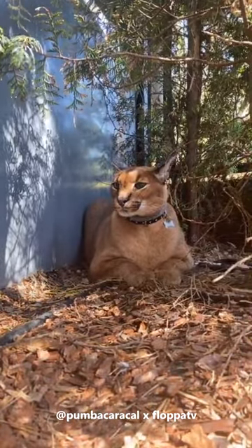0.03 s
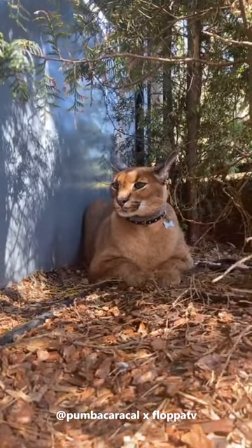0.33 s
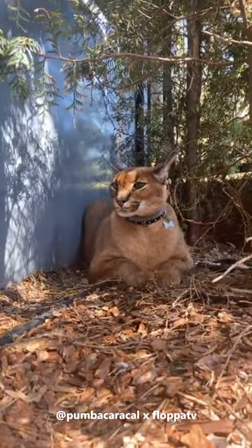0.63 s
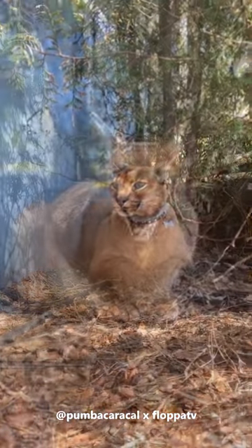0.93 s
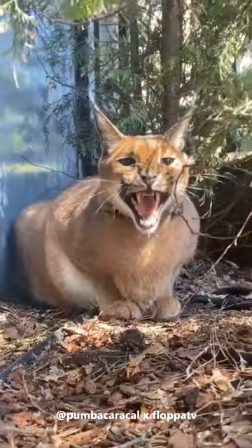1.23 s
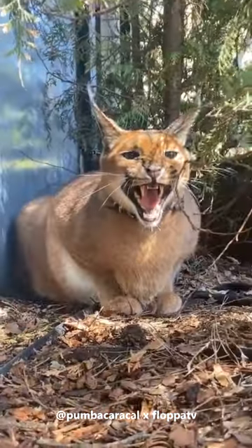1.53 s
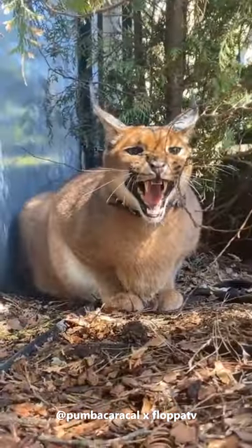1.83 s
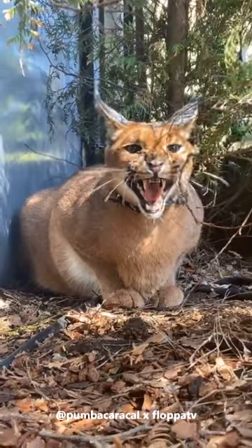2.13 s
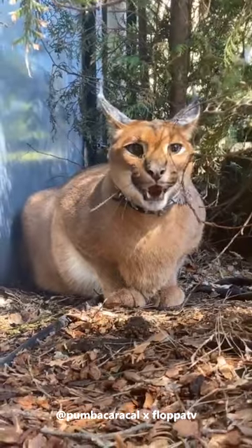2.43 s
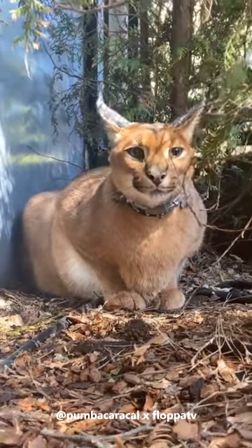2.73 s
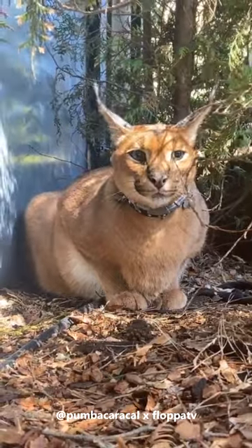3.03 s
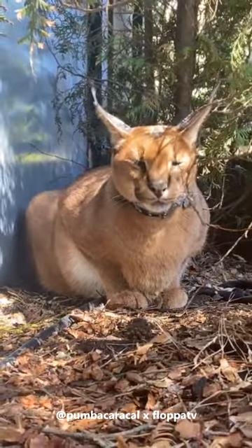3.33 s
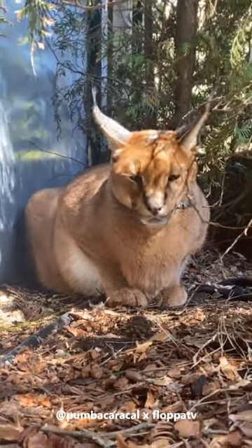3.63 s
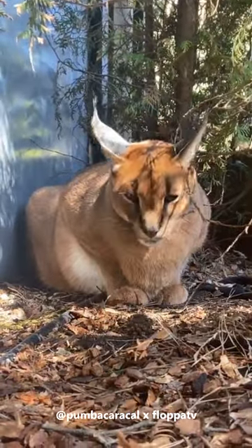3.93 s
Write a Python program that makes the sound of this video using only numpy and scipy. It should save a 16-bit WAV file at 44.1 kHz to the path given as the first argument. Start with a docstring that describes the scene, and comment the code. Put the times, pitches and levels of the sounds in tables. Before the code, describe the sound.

One long hiss from a caracal, with low gusts of wind buffeting the microphone.

```python
"""A broad outdoor rush comes first, at a microphone under garden trees; it fades to a quieter, distant
background. As it fades, a caracal opens its mouth and gives one long, breathy hiss: air forced through
the throat rings the mouth and dulls as the breath runs out. Wind buffets the microphone in low thumps,
the strongest of which overload it. Dry leaves tick twice, before the hiss and near the end."""
import sys
import numpy as np
from scipy import signal
from scipy.fft import rfft, irfft, next_fast_len
from scipy.io import wavfile
from scipy.ndimage import uniform_filter1d, map_coordinates

SR = 44100
rng = np.random.default_rng(int(sys.argv[2]) if len(sys.argv) > 2 else 0)


def put_to_file(sound):
    """Save the sound as 16-bit audio at rate SR, in the file named by the first command-line argument."""
    columns = np.atleast_2d(sound).T  # one column per channel
    safe = np.clip(columns, -1, 1)
    whole_steps = np.round(safe * 32767)
    wavfile.write(sys.argv[1], SR, whole_steps.astype(np.int16))


N = 176400

# colour of the opening rush: (frequency [Hz], relative level [dB])
RUSH_SPECTRUM = [(20, -20), (35, -5), (62, 4), (100, 1.5), (170, -4), (300, -5), (550, -7.5), (800, -7),
                 (1120, -7.5), (1600, -14), (2400, -21.5), (4000, -27.5), (5200, -30.5), (7600, -36),
                 (9200, -41), (10100, -45.5), (14000, -48), (15500, -53)]
# the rush fading away: (time [s], level [dB])
RUSH_ENVELOPE = [(0, -21.5), (.2, -21), (.6, -22), (.92, -22.5), (1.03, -26), (1.12, -39.5), (1.25, -80)]
# colour of the distant background: (frequency [Hz], relative level [dB])
DISTANT_SPECTRUM = [(60, 3), (200, 0.5), (420, 0.5), (700, -2), (1050, -4.5), (1500, -11.5), (2000, -17),
                    (2800, -23.5), (4000, -26), (5700, -34.5), (7300, -33.5), (8400, -39), (9100, -36.5),
                    (10200, -42.5), (14000, -45), (15500, -52)]
# drift of the distant background: (time [s], level [dB])
DISTANT_ENVELOPE = [(.8, -33.5), (1.1, -31.5), (2.3, -37.5), (2.6, -38.5), (3.1, -36.5), (3.5, -35.5),
                    (4, -35.5)]

# dry leaves ticking: (time [s], level [dB], pitch [Hz], time to fall 60 dB [s])
LEAF_CRACKS = [(.708, -53, 13950, .06), (3.761, -55, 8600, 0.055), (3.774, -46.5, 7000, .045)]

# force of the caracal's breath: (time [s], level [dB])
BREATH_ENVELOPE = [(.83, -90), (.875, -50.5), (.935, -40), (1.08, -36), (1.3, -35.5), (1.47, -38),
                   (1.66, -37.5), (1.93, -38.5), (2.1, -43), (2.255, -46), (2.29, -58), (2.33, -110)]
# resonances of throat and mouth: (centre [Hz], width [Hz], opening [dB], wide open [dB], relaxing [dB])
MOUTH_RESONANCES = [(800, 440, -4, -0.5, -2), (1530, 160, -7, -2, -6), (2040, 480, -4, -7.5, -7.5),
                    (2750, 340, -24, -18, -17), (3770, 460, -14, -14, -14.5), (4730, 950, -13, -12.5, -14),
                    (5430, 500, -10, -15, -17.5), (6480, 550, -20.5, -14.5, -16.5),
                    (7440, 1400, -21, -12.5, -14), (9240, 520, -9.5, -12, -13),
                    (9870, 240, -11, -21.5, -17.5), (10300, 410, -14, -26, -27.5),
                    (11460, 870, -22, -18.5, -22.5), (12200, 600, -16, -19.5, -28.5),
                    (13430, 600, -13, -12.5, -19.5), (14200, 850, -18, -17, -25),
                    (15400, 1000, -19, -20, -24)]
# how the mouth moves: (time [s], shape [0 opening, 1 wide open, 2 relaxing])
MOUTH_GAPE = [(.95, 0.21), (1.2, 0.91), (1.52, 0.82), (1.63, 1.55), (2.05, 1.9)]
# echoes reaching the microphone off ground and wall: (delay [s], level against the direct hiss [dB])
REFLECTIONS = [(.00104, -19), (.00135, -23), (.0029, -24.5)]

# steady wind on the microphone: (time [s], level [dB])
BREEZE_ENVELOPE = [(.9, -74), (1.15, -35), (1.4, -33), (1.7, -35), (1.9, -19), (2.4, -23.5), (2.65, -18.5),
                   (2.9, -20), (3.2, -19), (3.55, -26.5), (4, -19)]
# eddies striking the microphone: (peak time [s], half length [s], rumble level [dB], swirl level [dB])
WIND_EDDIES = [(1.48, 0.038, -24.5, -35), (1.558, 0.021, -18, -51), (1.646, 0.011, -16.5, -36),
               (1.758, 0.032, -19, -31), (1.845, 0.01, -4.5, -9), (1.89, 0.014, -4, -29),
               (1.926, 0.019, -10.5, -27), (1.955, 0.014, -14, -11.5), (2.044, 0.02, -2.5, -11.5),
               (2.086, 0.053, -14.5, -19), (2.196, 0.023, -16, -21.5), (2.291, 0.023, -13, -14),
               (2.368, 0.0072, -11.5, -40), (2.452, 0.0064, -9, -26), (2.502, .013, -7, -12.5),
               (2.549, 0.016, -7, -12.5), (2.635, 0.039, -10.5, -27.5), (2.791, 0.044, -12.5, -23),
               (3.004, .014, -15.5, -23), (3.093, .018, -13.5, -26), (3.316, 0.031, -10.5, -44),
               (3.397, 0.0072, -14, -41), (3.456, 0.015, -9.5, -18), (3.567, 0.088, -16, -34),
               (3.716, 0.0079, -12, -34)]
# deep shaking of the microphone: (frequency [Hz], relative level [dB])
RUMBLE_SPECTRUM = [(18, -49.5), (30, -18), (42, -1.5), (62, 5.5), (88, 6.5), (112, -6), (150, -14.5),
                   (220, -35.5), (350, -56), (700, -79.5), (2000, -140)]
# rougher flow above the rumble: (frequency [Hz], relative level [dB])
SWIRL_SPECTRUM = [(60, 1.5), (110, -0.5), (160, 0.5), (230, -7), (320, -19), (500, -38), (1000, -53),
                  (3000, -130)]
# sudden slaps of air on the microphone: (time [s], level [dB])
AIR_SLAPS = [(1.834, -8), (1.870, 6.5), (2.042, -15), (2.552, -2.5)]


def amp(db):
    """Decibels to gain."""
    return 10 ** (np.asarray(db) / 20)


def unit(x):
    """x at rms 1."""
    return x / np.sqrt(np.mean(x ** 2) + 1e-20)


def clock():
    """The time of each sample in seconds."""
    return np.arange(N) / SR


def curve(rows):
    """(time [s], value) points joined by straight lines."""
    return np.interp(clock(), *np.transpose(rows))


def wobble(per_s):
    """A smooth random curve with per_s knots a second."""
    return map_coordinates(rng.standard_normal(int(N * per_s / SR) + 4), [clock() * per_s])


def filtered(x, response):
    """x through a filter whose gain is response(hz)."""
    size = next_fast_len(N + SR // 2)
    return irfft(rfft(x, size) * response(np.fft.rfftfreq(size, 1 / SR)), size)[:N]


def coloured(x, spectrum):
    """x shaped by (frequency [Hz], level [dB]) points, at rms 1."""
    points_hz, db = np.transpose(spectrum)
    return unit(filtered(x, lambda hz: amp(np.interp(np.log(hz + 1), np.log(points_hz), db))))


def resonance(hz, centre, width):
    """Gain of a steep-sided resonance."""
    return 1 / (1 + 2 * ((hz - centre) / width) ** 2)


def turbulence(patchy_db):
    """White noise with patches of random gain across frequency and time."""
    cells = signal.stft(rng.standard_normal(N), nperseg=512)[2]
    patches = uniform_filter1d(rng.standard_normal(cells.shape), size=6, axis=0)
    patches = unit(uniform_filter1d(patches, size=12, axis=1))
    return signal.istft(cells * amp(patchy_db * patches), nperseg=512)[1][:N]


def even_noise(spectrum):
    """Coloured noise that holds its strength from moment to moment."""
    noise = coloured(rng.standard_normal(N), spectrum)
    power = uniform_filter1d(np.abs(signal.hilbert(noise)) ** 2, size=1100)
    return unit(noise / np.sqrt(np.abs(power) + 1e-6))


def outdoor_rush():
    """A broad rush fills the garden and fades as the hiss begins."""
    return coloured(turbulence(patchy_db=0.67), RUSH_SPECTRUM) * amp(curve(RUSH_ENVELOPE))


def distant_background():
    """A quiet wash from far off, uncovered when the rush fades."""
    return coloured(turbulence(patchy_db=0.74), DISTANT_SPECTRUM) * amp(curve(DISTANT_ENVELOPE))


def leaves(width_hz=1200, crack_db=-14, attack_s=.001):
    """Each dry leaf gives a short, bright crack with a faint pitch."""
    out = np.zeros(N)
    for start, db, pitch, t60 in LEAF_CRACKS:
        age = np.maximum(clock() - start, 0)
        colour = lambda hz: resonance(hz, pitch, width_hz) + amp(crack_db) * hz / (hz + pitch)
        crack = unit(filtered(rng.standard_normal(N), colour))
        out += crack * amp(db - 60 * age / t60) * (1 - np.exp(-age / attack_s))
    return out


def mouth_gain(hz, shape):
    """Throat and mouth resonances, added in power, for mouth shape 0, 1 or 2."""
    return np.sqrt(sum((amp(levels[shape]) * resonance(hz, centre, width)) ** 2
                       for centre, width, *levels in MOUTH_RESONANCES))


def caracal_hiss(flutter_db=0.57):
    """Air forced through the throat rings the mouth as it opens and relaxes; ground and wall echo it."""
    air = turbulence(patchy_db=1)
    gape = np.clip(curve(MOUTH_GAPE), 0, 2)
    hiss = np.zeros(N)
    for shape in range(3):
        blend = np.maximum(1 - np.abs(gape - shape), 0)
        hiss += blend * unit(filtered(air, lambda hz: mouth_gain(hz, shape)))
    notch = lambda hz: amp(-8.5 * resonance(hz, centre=11100, width=210))  # antiresonance of the mouth
    echoes = lambda hz: sum(amp(db) * np.exp(-2j * np.pi * hz * delay) for delay, db in REFLECTIONS)
    at_microphone = unit(filtered(hiss, lambda hz: notch(hz) * (1 + echoes(hz))))
    unsteady_breath = amp(curve(BREATH_ENVELOPE) + flutter_db * wobble(per_s=28))
    return at_microphone * unsteady_breath


def wind(sway_db=2, breeze_swirl_db=-13.5):
    """Breeze and eddies shake the microphone with a deep rumble and a rougher swirl above it."""
    breeze = amp(curve(BREEZE_ENVELOPE) + sway_db * wobble(per_s=23.65))
    rumble_power = breeze ** 2
    swirl_power = (amp(breeze_swirl_db) * breeze) ** 2
    for peak, half_length, rumble_db, swirl_db in WIND_EDDIES:
        offset = (clock() - peak) / half_length
        bump = np.exp(-np.minimum(offset ** 2 + offset ** 4 / 10, 100))  # a bell with short tails
        rumble_power += amp(rumble_db) ** 2 * bump
        swirl_power += amp(swirl_db) ** 2 * bump
    rumble = np.sqrt(rumble_power) * even_noise(RUMBLE_SPECTRUM)
    swirl = np.sqrt(swirl_power) * even_noise(SWIRL_SPECTRUM)
    return rumble + swirl


def air_slaps(swing_hz=116, t60_s=0.029, attack_s=0.00089):
    """A sudden push of air swings the microphone for a cycle or two."""
    out = np.zeros(N)
    for start, db in AIR_SLAPS:
        age = np.maximum(clock() - start, 0)
        envelope = amp(db - 60 * age / t60_s) * (1 - np.exp(-age / attack_s))
        out += envelope * np.sin(2 * np.pi * swing_hz * age)
    return out


def scene(low_cut_hz=35):
    """Garden and caracal at one microphone; the buffeting passes through its low cut."""
    garden = outdoor_rush() + distant_background() + leaves()
    hiss = caracal_hiss()
    low_cut = lambda hz: 1 / np.sqrt(1 + (low_cut_hz / (hz + 1)) ** 8)
    buffeting = filtered(wind() + air_slaps(), low_cut)
    return (garden + hiss + buffeting)[None]


def record(dry, hardness=21, fade_s=.004, top_hz=15750):
    """The strongest thumps overload the microphone and flatten; nothing above top_hz is kept."""
    flattened = dry[0] / (1 + np.abs(dry[0]) ** hardness) ** (1 / hardness)
    edge_fade = np.minimum(1, np.minimum(clock(), clock()[::-1]) / fade_s)
    return filtered(flattened * edge_fade, lambda hz: hz < top_hz)[None]


dry = scene()
out = record(dry)
put_to_file(out)
```